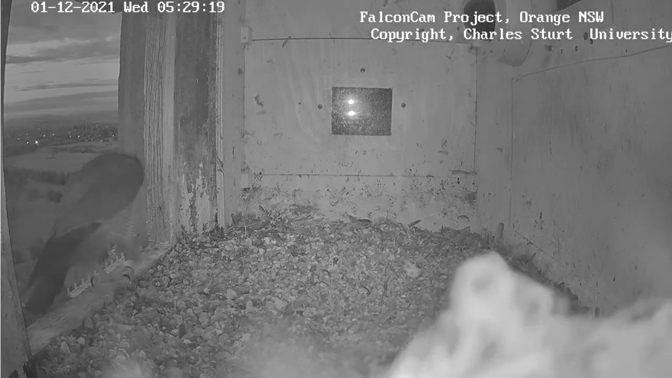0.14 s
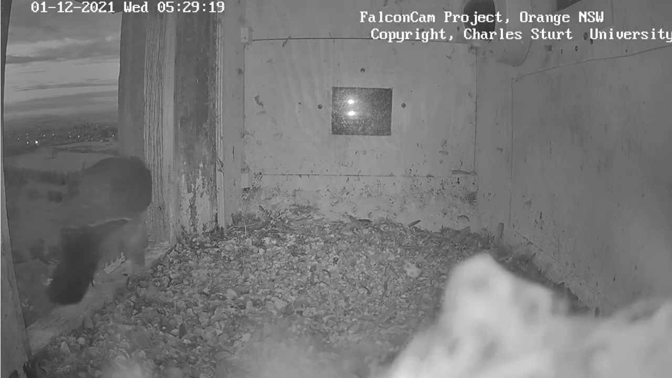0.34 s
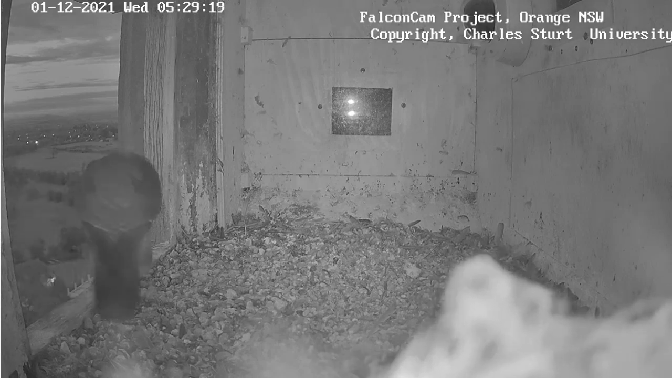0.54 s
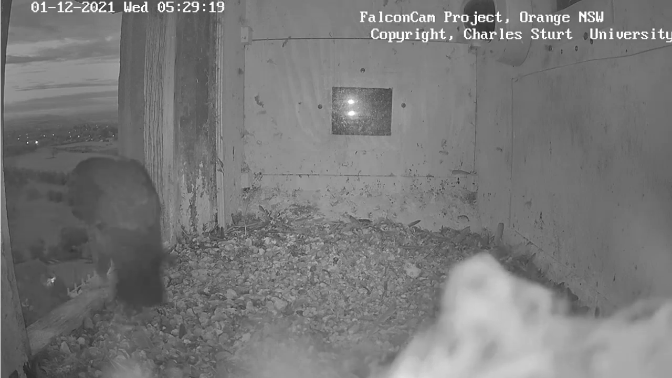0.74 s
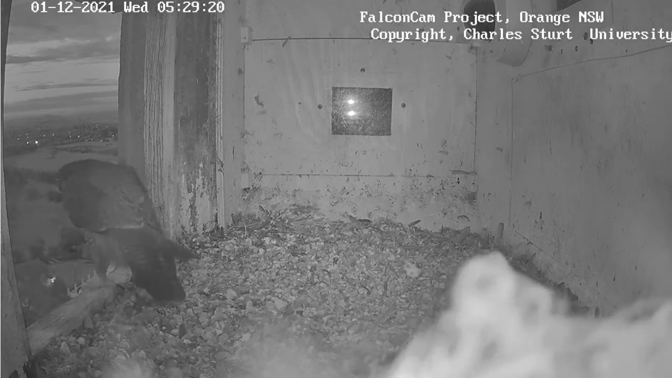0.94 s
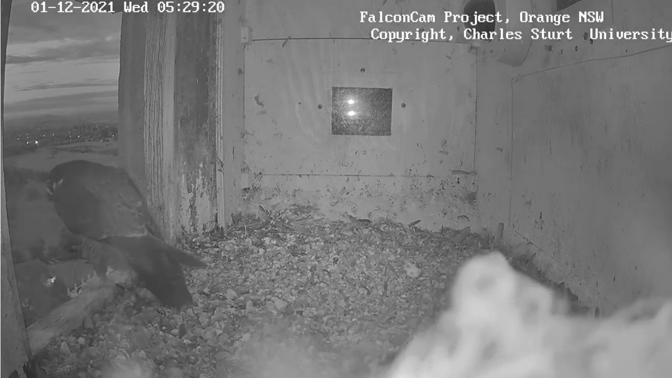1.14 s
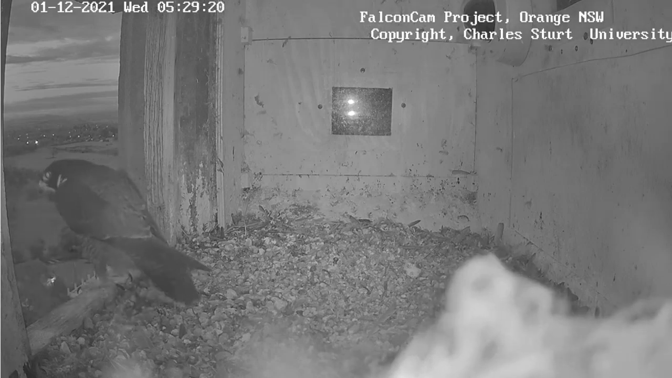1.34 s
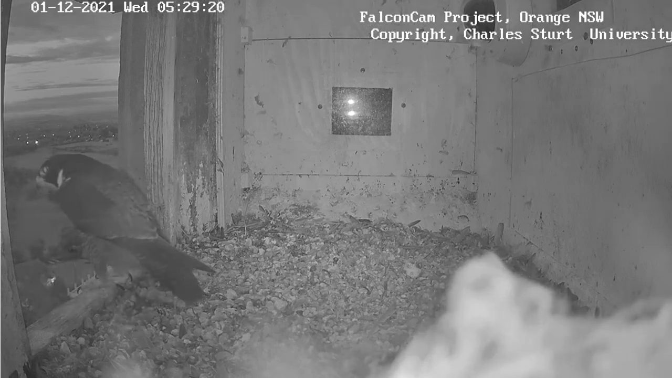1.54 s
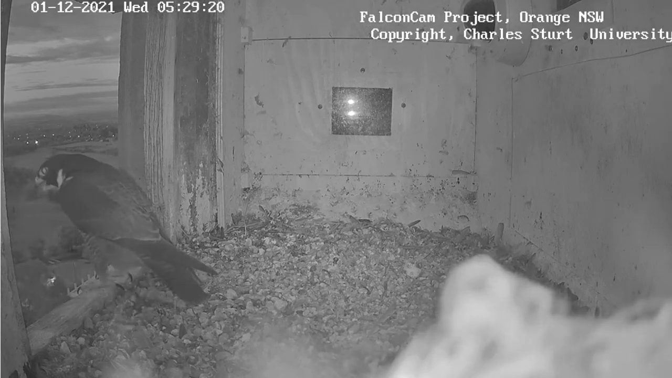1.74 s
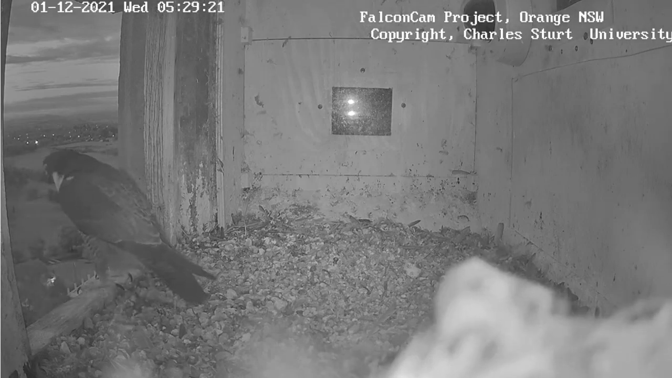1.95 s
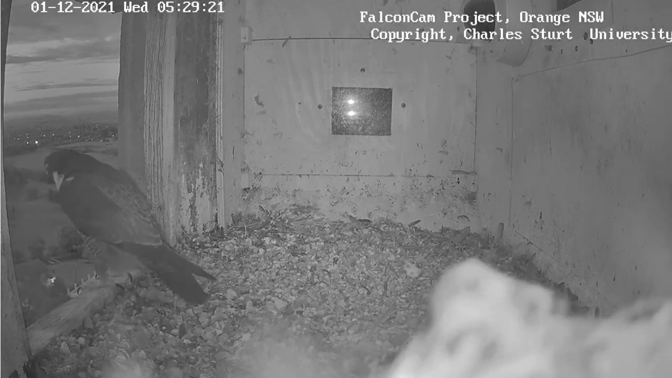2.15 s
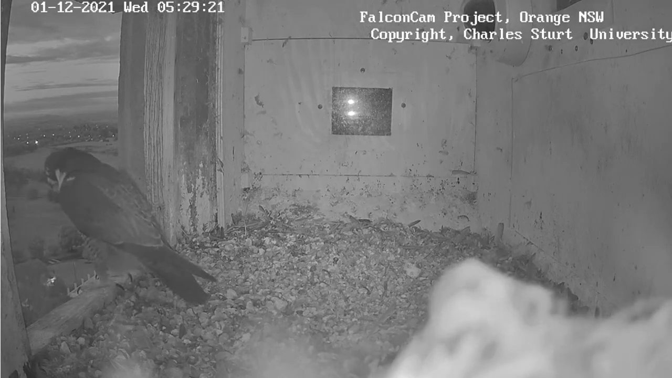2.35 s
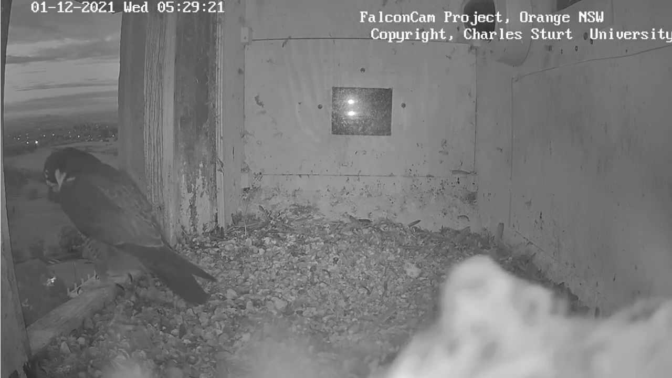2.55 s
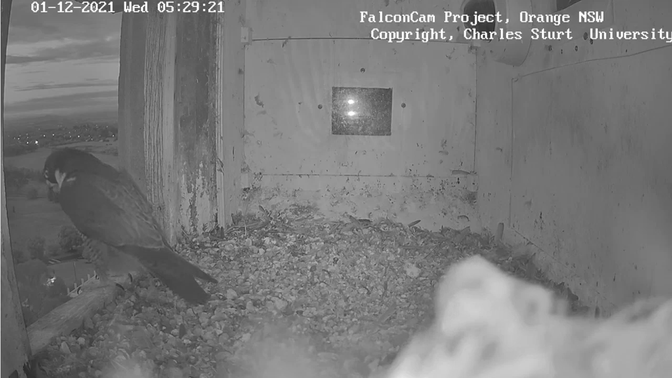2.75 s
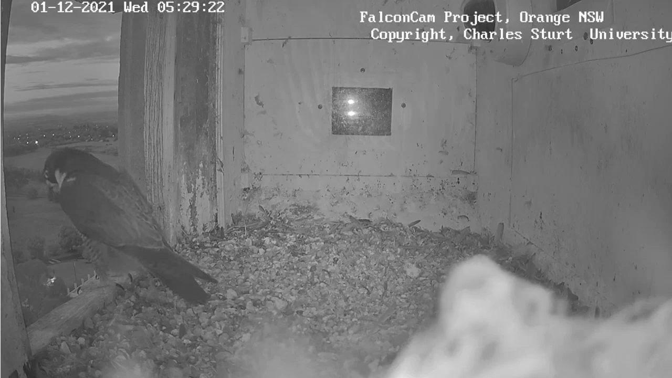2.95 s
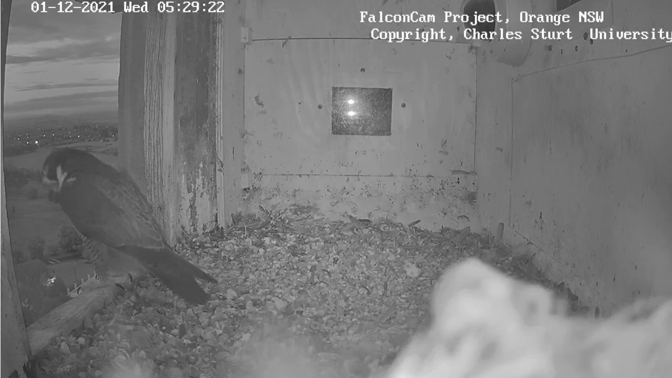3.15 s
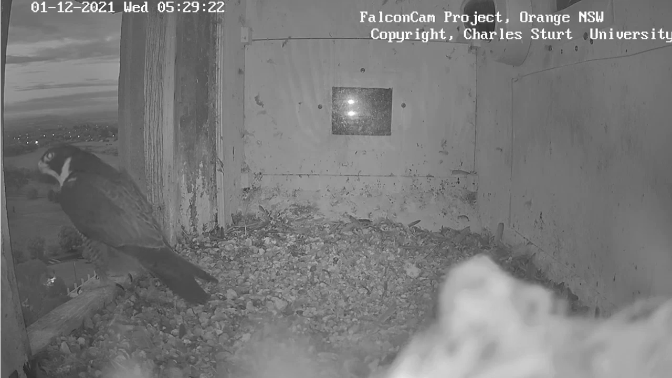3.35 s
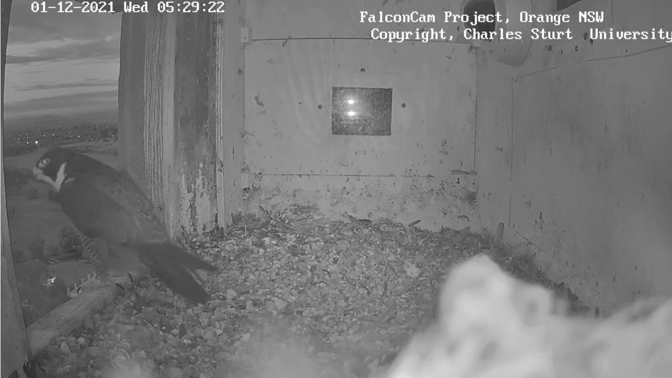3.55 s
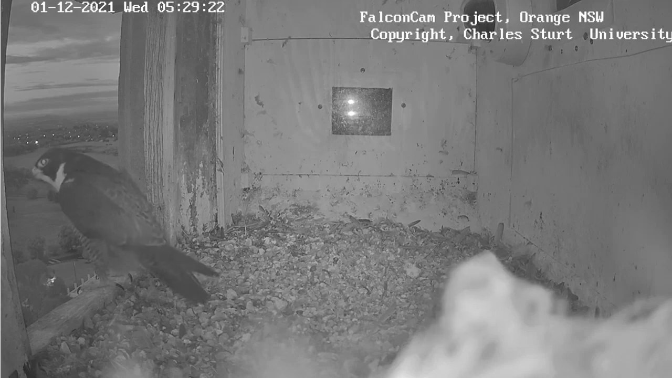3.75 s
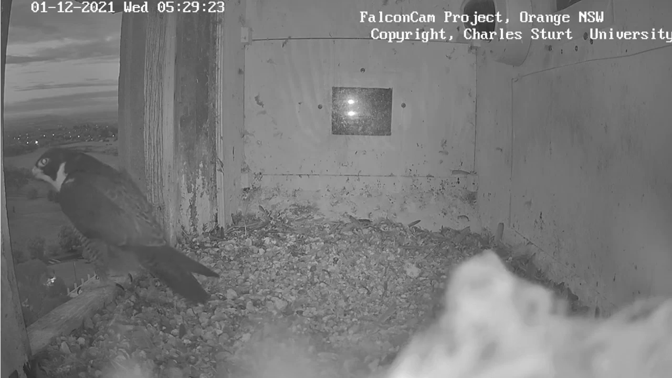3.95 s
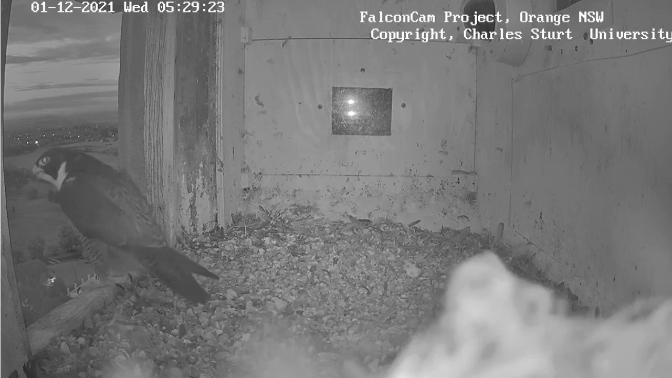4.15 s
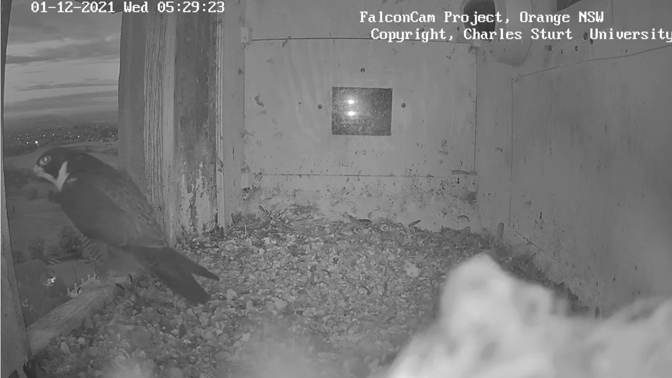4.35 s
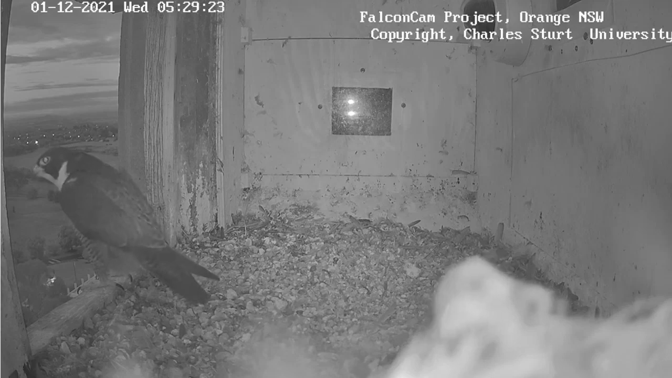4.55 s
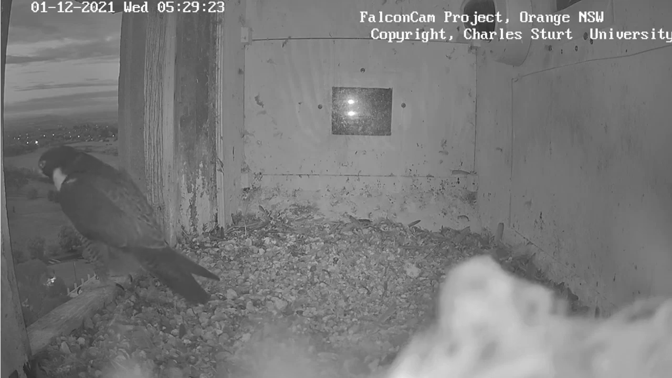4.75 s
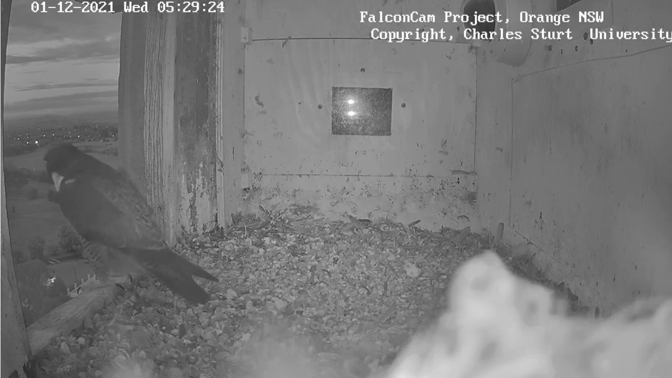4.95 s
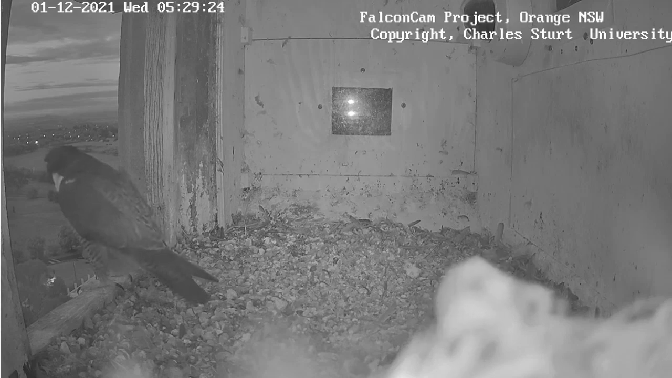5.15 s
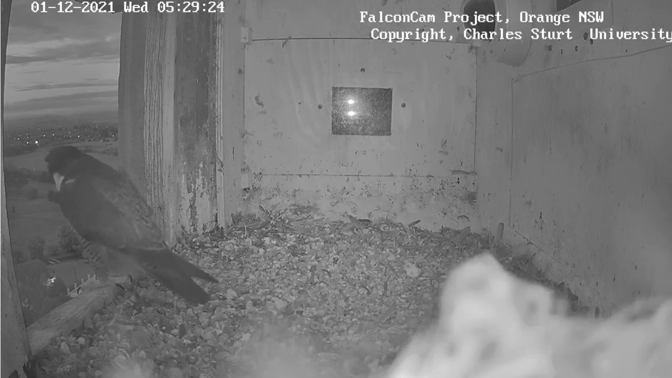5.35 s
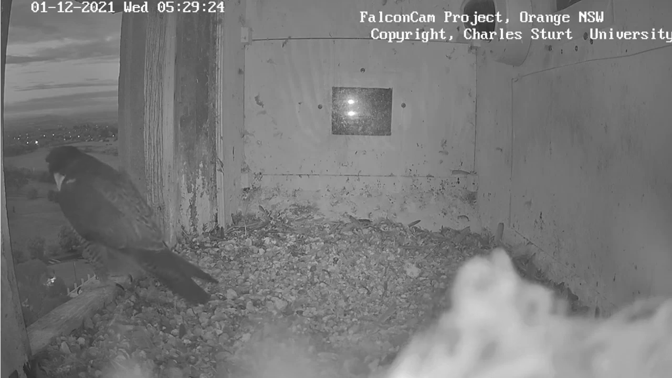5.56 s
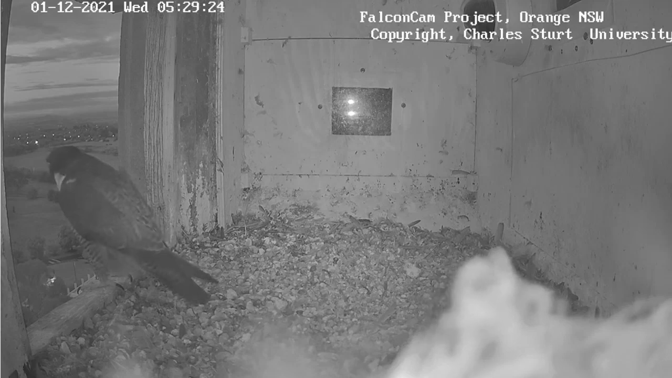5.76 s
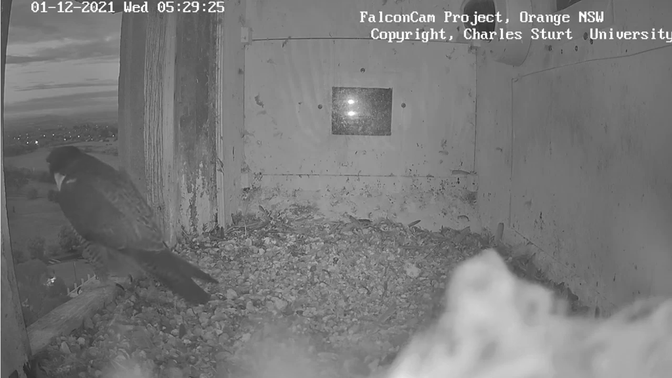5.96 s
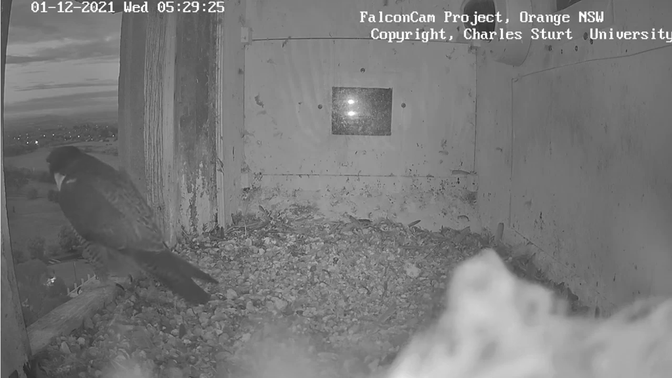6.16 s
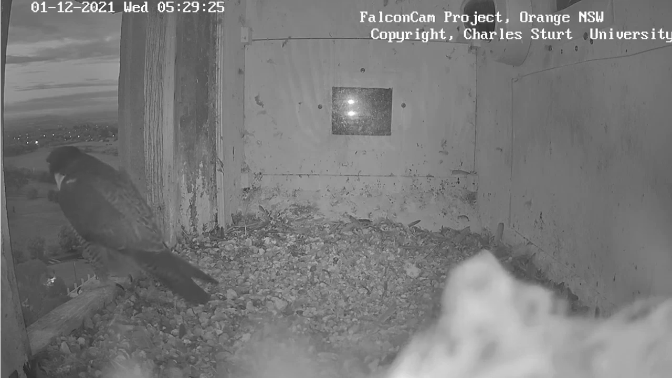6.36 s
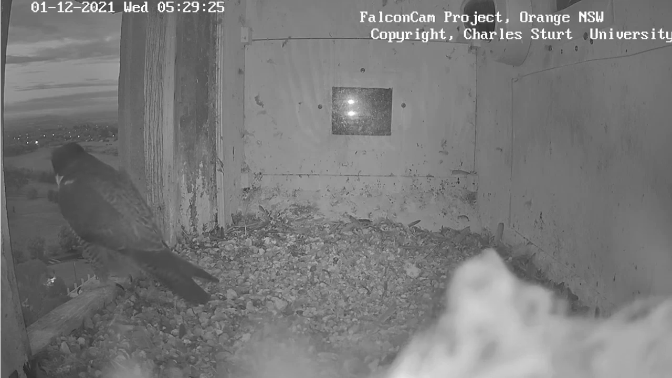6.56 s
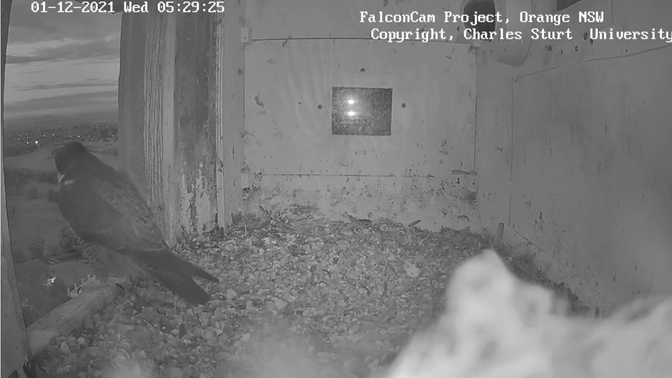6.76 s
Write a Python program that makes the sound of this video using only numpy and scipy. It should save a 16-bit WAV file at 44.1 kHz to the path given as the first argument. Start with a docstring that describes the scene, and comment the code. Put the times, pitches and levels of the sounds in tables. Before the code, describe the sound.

Close in a small, hard-walled nest box, a steady faint low mains hum and softly stirring air underlie everything. At 0 s the ring of a falcon's call is already dying away with the end of a tiny yip. At 0.3 s comes the loudest call: a thin rising squeal snapping into a piercing yelp, with a dull floor bump. A harsh, raspy 'chup' follows at 0.8 s, another sharp 'ee-chip' at 1.25 s, then a chup and quick yip at 1.8 s. Every call rings on in the hollow with a short dull echo. Another soft bump comes near 2.8 s as faint distant dawn birds begin to whistle and twitter. A chup at 3.5 s and shorter, weaker chips at 4.15 and 4.85 s end the calling. The ring fades; from 5 to 7 s only hum, air and faint high twitter with small whistles remain.

```python
"""Over mains hum and softly stirring air, the ring of a falcon's call is dying away as the tail of a yip is heard.
Sharp 'ee-chip' and harsh 'chup' calls follow, close to the microphone, with dull bumps of the box floor.
The one voice jumps between thin squeal, loud yelp, rasping cluck and falling creak, each a set of gliding
partials with pulsed noise; a hard-walled hollow rings on as decaying noise and one dull echo.
From the third second, faint whistles and twitter of far dawn birds come in as gliding sines."""
import sys
import numpy as np
from scipy import signal
from scipy.fft import rfft, irfft, next_fast_len
from scipy.io import wavfile
from scipy.ndimage import uniform_filter1d, minimum_filter1d

SR = 44100
rng = np.random.default_rng(int(sys.argv[2]) if len(sys.argv) > 2 else 0)


def wav_record(signal):
    """Record a signal, one row per channel, as 16-bit PCM in the file named by sys.argv[1]."""
    frames = np.transpose(np.atleast_2d(signal))
    bounded = np.clip(frames, -1, 1)
    # unit amplitude maps onto the largest positive 16-bit level
    quanta = np.round(bounded * 32767).astype(np.int16)
    wavfile.write(sys.argv[1], SR, quanta)


N = 300321  # samples

LEAD_S = 0.25  # room ahead of the start, for calls that are already ringing
TOP_HZ = 15700  # highest partial, and the final treble cut
OVERLAP_S = 0.005  # one register still sounds as the next sets in
YELP_KNEE_SHARE, YELP_END_SHARE = 0.96, 0.885  # a yelp sags: pitch as shares of its start


def undb(db):
    """Decibels to gain."""
    return 10 ** (np.asarray(db) / 20)


def unit(x):
    """Scale to rms 1."""
    return x / np.sqrt(np.mean(x ** 2) + 1e-18)


def at_hz(points, hz):
    """Read (Hz, value) points on a log-frequency axis."""
    f, value = np.transpose(points)
    return np.interp(np.log(np.maximum(hz, 1)), np.log(f), value)


def colour(x, points):
    """Filter by a (Hz, dB) spectrum."""
    size = next_fast_len(2 * len(x))
    gain = undb(at_hz(points, np.fft.rfftfreq(size, 1 / SR)))
    return irfft(rfft(x, size) * gain, size)[:len(x)]


def wander(size, rate):
    """Random motion: straight lines between `rate` random points a second, with a spread near 1."""
    steps = np.arange(size) * rate / SR
    return np.interp(steps, np.arange(size), rng.standard_normal(size))


def add(track, start, sound):
    """Mix a sound into a track at a time in seconds."""
    i = max(int(start * SR), 0)
    track[i:i + len(sound)] += sound[:max(len(track) - i, 0)]


def swell(u, crest, fullness):
    """One push of air over u = 0..1, strongest at the crest; low fullness exponents flatten its top."""
    arch = np.interp(u, [0, np.clip(crest, .05, .95), 1], [0, .5, 1])
    return np.sin(np.pi * arch).clip(0) ** fullness


def background(mains_hz=50, flutter_db=1.65):
    """Mains hum, sines on exact multiples of its base, over noise whose level stirs softly."""
    # Hum lines: pitch_hz [Hz], level_db [dB rms]
    hum_lines = [(50, -42), (150, -53.5), (200, -61.5), (250, -49.5), (300, -54.5), (350, -62), (400, -59)]
    # Spectrum of the air noise: frequency_hz [Hz], relative_level_db [dB]
    air_spectrum = [(20, -36.5), (50, -21.5), (76, -6.5), (105, -15.5), (145, -11.5), (200, -13),
                    (260, -12.5), (350, -19), (600, -17), (950, -40), (1750, -30), (3700, -39.5),
                    (6000, -39), (9200, -51), (15500, -49)]
    air_db = -48
    t = np.arange(N) / SR
    hum = np.zeros(N)
    for hz, db in hum_lines:
        cycles = round(hz / mains_hz) * mains_hz * t + rng.random()
        hum += undb(db) * unit(np.sin(2 * np.pi * cycles))
    air = unit(colour(rng.standard_normal(N), air_spectrum))
    return hum + air * undb(air_db + flutter_db * wander(N, 6))


def chup_notes(start, cluck_s, cluck_hz, cluck_db, creak_hz, creak_end_hz, creak_db):
    """A rasping cluck rises and tips over into a falling creak."""
    start_share, cluck_to_hz = 0.7, 688  # first pitch as a share of the knee pitch; last pitch
    creak_s = 0.03874
    # levels against each leading partial
    cluck_overtones_db, cluck_rasp_db = -1, -4.5
    creak_overtones_db, creak_rasp_db = 2, -5.5
    return [
        ("cluck", start, cluck_s, cluck_hz * start_share, cluck_hz, cluck_to_hz,
         cluck_db, cluck_db + cluck_overtones_db, cluck_db + cluck_rasp_db),
        ("creak", start + cluck_s - OVERLAP_S, creak_s,
         creak_hz, (creak_hz + creak_end_hz) / 2, creak_end_hz,
         creak_db, creak_db + creak_overtones_db, creak_db + creak_rasp_db)]


def yip_notes(start, length, hz, db):
    """A short, clean little yelp, sagging in pitch."""
    overtones_db, rasp_db = -8, -18.5  # against the leading partial
    return [("yelp", start, length, hz, hz * YELP_KNEE_SHARE, hz * YELP_END_SHARE,
             db, db + overtones_db, db + rasp_db)]


def ee_chip_notes(start, squeal_s, break_s, top_hz, yelp_hz,
                  squeal_db, overtones_db, break_db, yelp_db, harsh_db):
    """A rising squeal breaks upward, slides down into a loud yelp and shuts with a falling cluck."""
    # the squeal climbs from near the resting pitch: shares of the climb made at its start and knee
    rest_hz, start_share, knee_share = 1890, 0.33, 0.82
    squeal_rasp_db = -6.5  # against its overtones
    slide_hz_per_s, slide_knee_share = 9500, 0.75
    break_lead_db, break_rasp_db = 1.5, -8.5  # against the break's overtones
    yelp_s, yelp_overtones_db, yelp_rasp_db = 0.023, -7, -12  # levels against its leading partial
    close_delay_s, close_s = 0.012, 0.029
    close_from_hz, close_knee_hz, close_to_hz = 660, 452.1, 247
    close_lead_db, close_overtones_db, close_rasp_db = -13.5, -11, -11  # against the yelp
    break_at = start + squeal_s
    yelp_at = break_at + break_s
    climb = top_hz - rest_hz
    slide = slide_hz_per_s * break_s
    return [
        ("squeal", start, squeal_s + OVERLAP_S,
         rest_hz + start_share * climb, rest_hz + knee_share * climb, top_hz,
         squeal_db, overtones_db, overtones_db + squeal_rasp_db + harsh_db),
        ("yelp", break_at, break_s + OVERLAP_S,
         yelp_hz + slide, yelp_hz + slide_knee_share * slide, yelp_hz,
         break_db + break_lead_db, break_db, break_db + break_rasp_db + harsh_db),
        ("yelp", yelp_at, yelp_s, yelp_hz, yelp_hz * YELP_KNEE_SHARE, yelp_hz * YELP_END_SHARE,
         yelp_db, yelp_db + yelp_overtones_db, yelp_db + yelp_rasp_db + harsh_db),
        ("cluck", yelp_at + close_delay_s, close_s, close_from_hz, close_knee_hz, close_to_hz,
         yelp_db + close_lead_db, yelp_db + close_overtones_db + harsh_db,
         yelp_db + close_rasp_db + harsh_db)]


def notes_in(name):
    """All notes of one register: start, length, pitch at start, knee and end, lead, rest and rasp dB."""
    # 'Chup' calls: start_s [s], cluck_length_s [s], cluck_knee_hz [Hz], cluck_db [dB],
    # creak_start_hz [Hz], creak_end_hz [Hz], creak_db [dB]
    chups = [ (-0.125, 0.036, 459.4, -13.5, 1110, 1050, -16), (0.792, 0.026, 503, -13.5, 1210, 1040, -20),
             (1.792, 0.034, 532.3, -14.5, 1145, 972.4, -23), (3.486, 0.032, 522.7, -13.5, 1146, 955, -25.5)]
    # Short yips, each soon after a chup: start_s [s], length_s [s], pitch_hz [Hz], level_db [dB]
    yips = [(-0.012, 0.028, 2880, -28), (1.866, 0.017, 2655, -21.5)]
    # 'Ee-chip' calls: start_s [s], squeal_length_s [s], break_length_s [s], squeal_top_hz [Hz],
    # yelp_hz [Hz], squeal_db [dB], squeal_overtones_db [dB], break_db [dB], yelp_db [dB], harshness_db [dB]
    ee_chips = [ (0.285, 0.1, 0.010, 2520, 2558, -21.5, -34, -10.5, -8.5, -2.5),
                (1.247, 0.075, 0.007, 2328, 2452, -21.5, -35, -22.5, -12.5, 0),
                (4.14, 0.042, 0.002, 2026, 2276, -26, -38.5, -24.5, -17.5, -2.5),
                (4.849, 0.040, 0.024, 2164, 2181, -31, -32.5, -25.5, -19.5, -11)]
    notes = []
    for rule, calls in [(ee_chip_notes, ee_chips), (chup_notes, chups), (yip_notes, yips)]:
        for call in calls:
            notes += [note for voice, *note in rule(*call) if voice == name]
    return notes


def register(notes, throat, order, knee, crest, rasp_crest, fullness, jitter, shimmer_db, rasp_tilt_db,
             attack_s, waver=.008, waver_hz=110, jitter_hz=700):
    """Gliding notes of the syrinx: partial `order` leads, the rest and a pulsed rasp pass the throat."""
    out = np.zeros(N + int(LEAD_S * SR))
    for start, length, first_hz, knee_hz, last_hz, lead_db, rest_db, rasp_db in notes:
        size = int(length * SR)
        u = np.arange(size) / size
        pitch = np.interp(u, [0, knee, 1], [first_hz, knee_hz, last_hz])
        # uneven cycles leave the low partials clean and smear the high ones
        uneven = jitter * wander(size=8192, rate=jitter_hz) + waver * wander(size=8192, rate=waver_hz)
        phase = 2 * np.pi * np.cumsum(pitch * (1 + uneven[:size])) / SR
        # the strained voice shakes: eight separate motions are shared out among the partials
        shake = [shimmer_db * wander(size=8192, rate=2 * waver_hz)[:size] for _ in range(8)]
        rest = np.zeros(size)
        for k in range(1, int(TOP_HZ / pitch.max()) + 1):
            if k != order:
                gain = undb(at_hz(throat, k * pitch) + shake[k % len(shake)])
                rest += gain * np.cos(k * phase + np.sqrt(k) * np.pi)
        # air escapes in one puff a cycle, with its own share of treble
        puffs = rng.standard_normal(8192)[:size] * (1 + np.cos(phase))
        rasp = colour(colour(puffs, throat), [(6000, 0.0074), (12000, rasp_tilt_db)])
        lead = unit(np.cos(order * phase) * undb(shake[order] / 2))
        lead = undb(lead_db) * lead * swell(u, crest, fullness)
        edge = undb(rest_db) * unit(rest) + undb(rasp_db) * unit(rasp)
        edge = edge * swell(u, rasp_crest, fullness)
        # the oscillation takes a few cycles to build
        attack = 1 - np.exp(-u * length / attack_s)
        add(out, start + LEAD_S, (lead + edge) * attack)
    return out


def falcon():
    """The four registers of the one voice, each with its own throat resonances and roughness."""
    # Throat colour of each register: frequency_hz [Hz], relative_level_db [dB]
    squeal_throat = [(2100, -4.5), (3200, -2.5), (5900, -10.5), (6500, 0.5), (7400, -10), (8200, 2),
                     (9400, -2), (10200, -22.5), (11200, -7.5), (12200, -14.5), (14000, -27),
                     (15500, -40.5)]
    yelp_throat = [(1500, -11.5), (2400, 0.5), (3400, 1.5), (4400, 0.5), (5200, 2), (5700, -5.5), (6350, 1),
                   (7000, -1.5), (7800, -22), (9500, -22.5), (12000, -35), (15000, -53)]
    cluck_throat = [(150, -14.5), (320, -18), (850, -15.5), (1200, -5), (1750, 5.5), (2200, 6), (2800, -15),
                    (3350, -1), (4100, -16), (5200, -15.5), (7200, -22.5), (8500, -41), (15000, -58)]
    creak_throat = [(600, -20), (1100, 2), (2200, -10.5), (3300, -1), (4300, -5), (5700, -4.5),
                    (6700, -3.5), (7800, -29.5), (9500, -30), (15000, -47)]
    squeal = register(notes_in("squeal"), squeal_throat, order=2, knee=0.48, crest=0.41, rasp_crest=0.35,
                      fullness=0.42, jitter=0.014, shimmer_db=4.5, rasp_tilt_db=-6, attack_s=.005)
    yelp = register(notes_in("yelp"), yelp_throat, order=1, knee=.35, crest=0.25, rasp_crest=0.47,
                    fullness=0.48, jitter=.016, shimmer_db=7.5, rasp_tilt_db=4.5, attack_s=0.0014)
    cluck = register(notes_in("cluck"), cluck_throat, order=1, knee=.4, crest=0.67, rasp_crest=0.47,
                     fullness=0.59, jitter=0.053, shimmer_db=7.0, rasp_tilt_db=-1.0, attack_s=0.0029)
    creak = register(notes_in("creak"), creak_throat, order=5, knee=.35, crest=0.73, rasp_crest=0.29,
                     fullness=0.94, jitter=0.026, shimmer_db=11, rasp_tilt_db=-2.5, attack_s=.002)
    return squeal + yelp + cluck + creak


def hollow(x, wet_db, build_s, echo_s, echo_db):
    """Dense reflections, the treble mostly dying first, and one dull echo from the far wall."""
    # Decay of the hollow: frequency_hz [Hz], t60_s [s to fall 60 dB]
    decay_times = [(300, 6), (600, 3.5), (1200, 2.5), (2200, 1.89), (3300, 1.5), (4600, 1.1844),
                   (6500, 0.8255), (9000, 0.5), (14000, 0.7)]
    # Colour of the hollow: frequency_hz [Hz], relative_level_db [dB]
    ring_colour = [(150, 4.5), (320, 3), (520, -7), (690, 1), (860, -7.5), (1150, -2.5), (2300, 0.5),
                   (2900, 1), (3400, 2.5), (5200, 2), (7000, 2.5), (12000, -3.5)]
    size = 3 * SR
    t, hz = np.arange(size) / SR, np.fft.rfftfreq(size, 1 / SR)
    noise = rfft(rng.standard_normal(size))
    centres, t60s = np.transpose(decay_times)
    response = np.zeros(size)
    # each row of the identity opens one band, crossfading into its neighbours
    for band, t60 in zip(np.eye(len(centres)), t60s):
        band_noise = irfft(noise * at_hz(np.c_[centres, band], hz), size)
        response += band_noise * np.exp(-np.log(1000) * t / t60)
    build_up = 1 - np.exp(-t / build_s)
    response = colour(response, ring_colour) * build_up * undb(wet_db) / np.sqrt(SR)
    out = signal.fftconvolve(x, response)[:len(x)]
    echo = colour(x, [(650, -3.5), (1500, -10.0), (6000, -20.5)])
    add(out, echo_s, undb(echo_db) * echo)
    return out


def shuffles():
    """Dull bumps of the box floor as the bird shifts its weight: swells of low noise."""
    # Shifts on the ledge: start_s [s], length_s [s], level_db [dB before the swell]
    shifts = [(0.222, 0.24, -39), (0.85, 0.66, -53), (2.804, 0.12, -41)]
    floor_colour = [(50, -12.5), (85, -7.5), (170, -2.5), (300, -9.0), (900, -33.5), (4000, -58.5)]
    out = np.zeros(N)
    for start, length, db in shifts:
        u = np.linspace(0, 1, int(length * SR))
        rumble = colour(rng.standard_normal(SR), floor_colour)[:len(u)]
        add(out, start, undb(db) * unit(rumble) * swell(u, crest=0.22, fullness=1.5))
    return out


def songbirds(warble=0.03, warble_hz=1000, spread=0.092, scatter_db=2.5, count=260):
    """Faint slurred whistles, and scattered twitter further away, all of gliding, warbling sines."""
    # Far whistles: start_s [s], length_s [s], start_hz [Hz], end_hz [Hz], level_db [dB before the swell]
    whistles = [(2.867, 0.035, 2480, 2250, -51), (2.898, 0.088, 1760, 1460, -55.5),
                (3.117, 0.062, 2400, 2096, -60), (3.311, 0.05, 3900, 3520, -61.5),
                (5.43, 0.076, 3060, 3440, -59), (6.212, 0.044, 1814, 1570, -51.5),
                (6.66, 0.063, 1770, 1476, -58)]
    # Bouts of twitter that swell, sink in pitch and fade: start_s [s], length_s [s],
    # centre_start_hz [Hz], centre_end_hz [Hz], peak_note_db [dB before scatter and swell]
    twitter_bouts = [(2.4, 1.7, 5000, 3996, -76.5), (5.1, 2.1, 7450, 5310, -71.5)]
    note_s = 0.06
    chirps = list(whistles)
    for start, length, from_hz, to_hz, db in twitter_bouts:
        for u, (high, slur, loud) in zip(rng.random(count), rng.standard_normal((count, 3))):
            hz = (from_hz + (to_hz - from_hz) * u) * np.exp(spread * high)
            end_hz = hz * np.exp(.06 * slur)
            bout_db = 20 * np.log10(np.sin(np.pi * u))
            chirps.append((start + u * length, note_s, hz, end_hz, db + bout_db + scatter_db * loud))
    out = np.zeros(N)
    for start, length, first_hz, last_hz, db in chirps:
        u = np.linspace(0, 1, int(length * SR))
        glide = first_hz + (last_hz - first_hz) * u
        pitch = glide * (1 + warble * wander(size=8192, rate=warble_hz)[:len(u)])
        tone = unit(np.sin(2 * np.pi * np.cumsum(pitch) / SR))
        add(out, start, undb(db) * tone * np.sin(np.pi * u))
    return out


def limit(x, size=129):
    """A fast limiter turns both channels down around any peak over full scale."""
    gain = 1 / np.maximum(np.abs(x).max(axis=0), 1)
    return x * uniform_filter1d(minimum_filter1d(gain, size), size)


def scene():
    """The bird mostly a little to the left, its ring in the hollow, and the dawn outside."""
    # Left minus right level of the calls: frequency_hz [Hz], difference_db [dB]
    mic_balance = [(200, 0), (400, 2.4), (700, 2), (1290, 4.5), (2380, 3.5), (4400, 1.5), (6500, -0.55),
                   (9000, 2)]
    voice = falcon()
    ring = hollow(voice, wet_db=5.5, build_s=0.014, echo_s=0.088, echo_db=-11)
    calls = (voice + ring)[-N:]  # drops the lead-in
    hz, db = np.transpose(mic_balance)
    placed = np.array([colour(calls, np.c_[hz, side * db / 2]) for side in (1, -1)])
    return placed + shuffles() + songbirds() + background()


def record(dry):
    """The sound all but drops out three times for an instant, peaks are limited and the top is cut."""
    # Dropouts: start_s [s], length_s [s]
    dropouts = [(0.3283, 0.0014), (1.3489, 0.0024), (4.2526, 0.0026)]
    out = dry.copy()
    for start, length in dropouts:
        out[:, int(start * SR):int((start + length) * SR)] *= .05
    top_cut = signal.ellip(8, .2, 70, TOP_HZ, fs=SR, output="sos")
    return signal.sosfilt(top_cut, limit(out))


dry = scene()
out = record(dry)
wav_record(out)
```